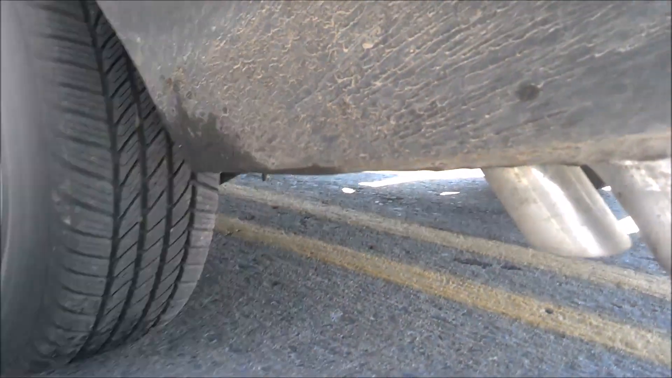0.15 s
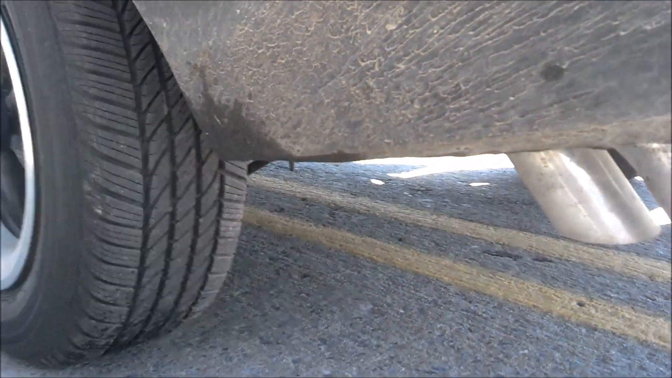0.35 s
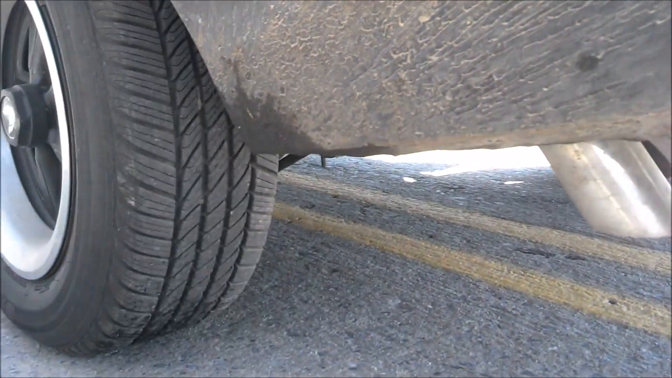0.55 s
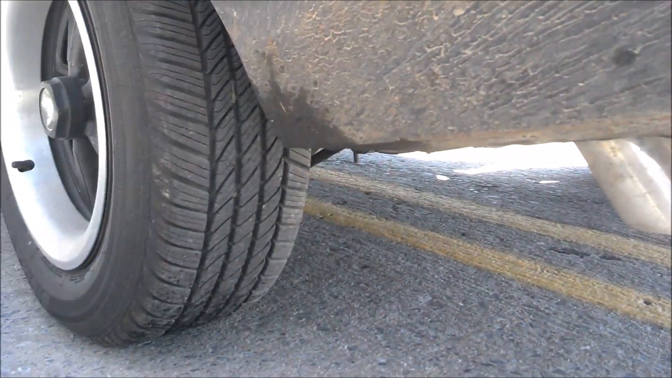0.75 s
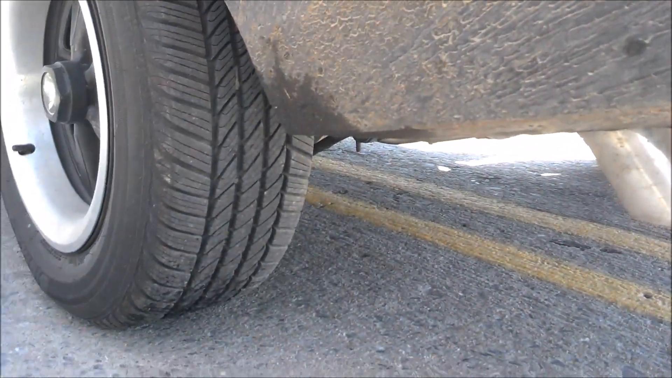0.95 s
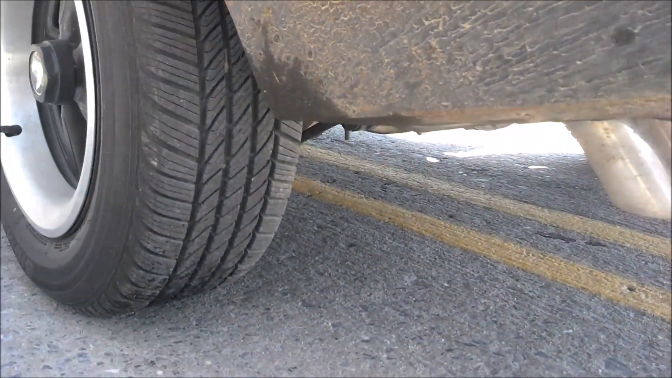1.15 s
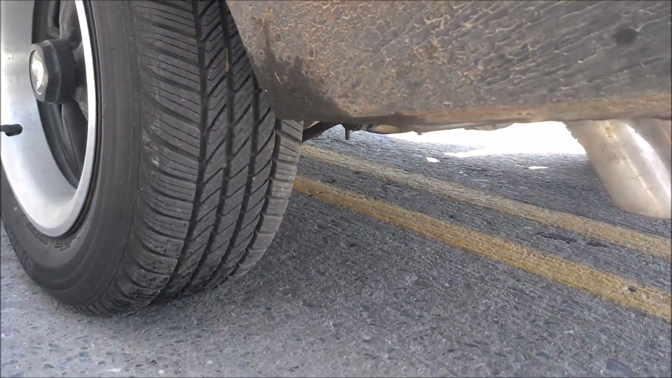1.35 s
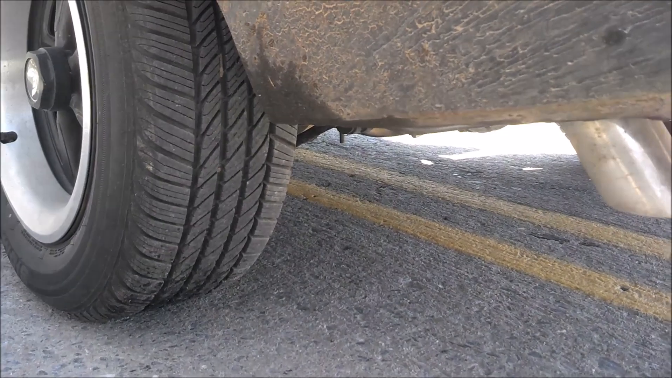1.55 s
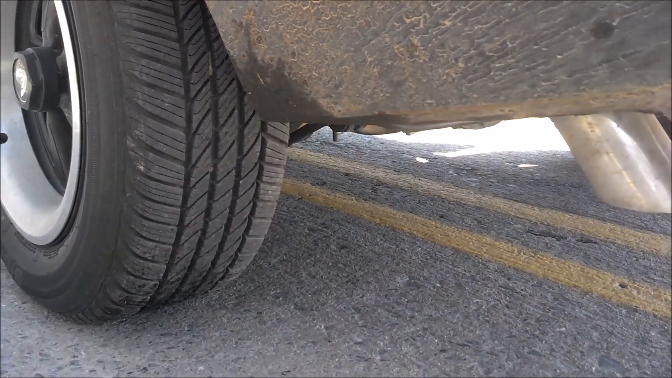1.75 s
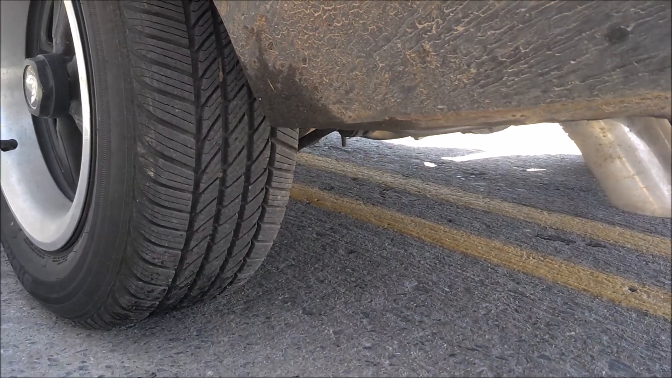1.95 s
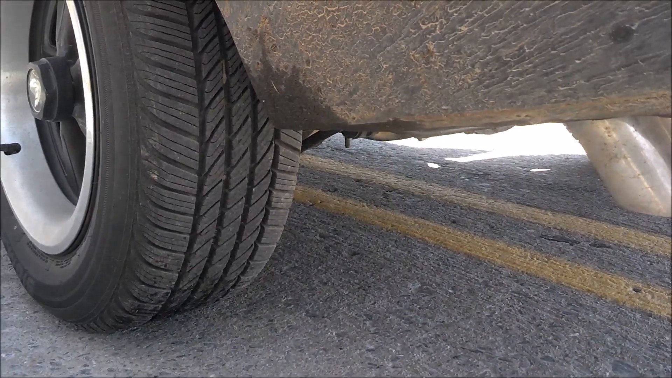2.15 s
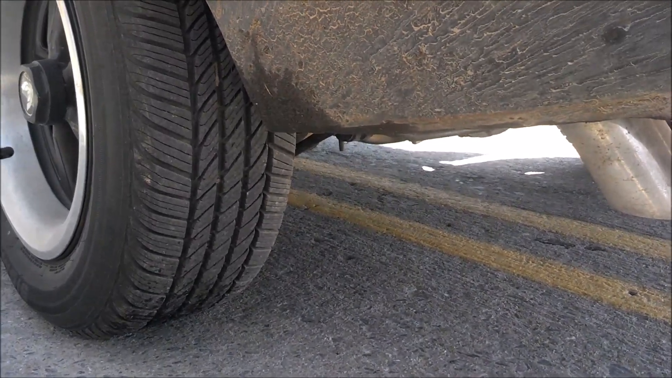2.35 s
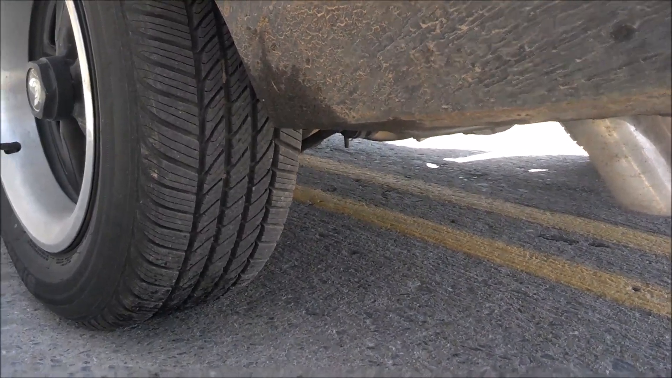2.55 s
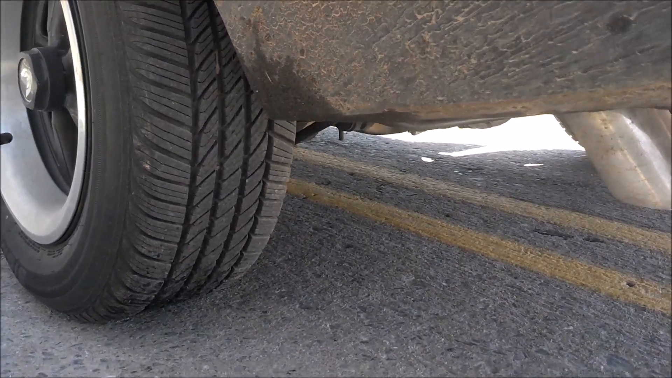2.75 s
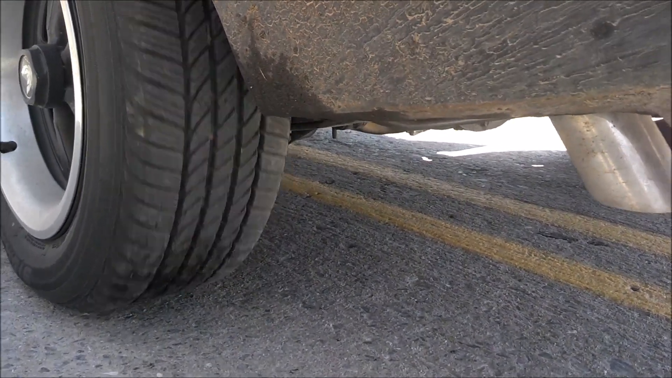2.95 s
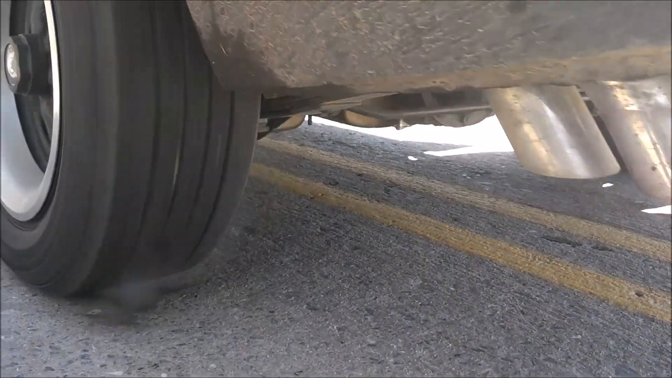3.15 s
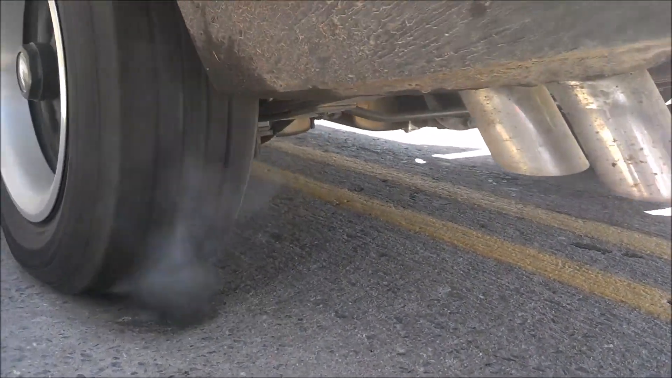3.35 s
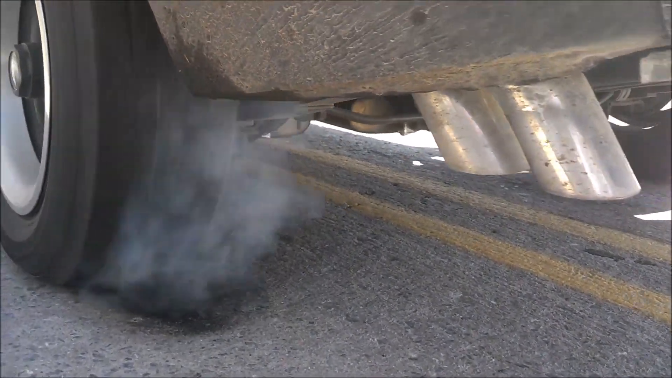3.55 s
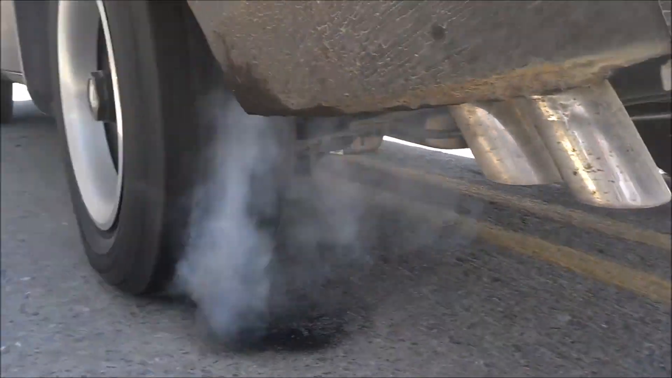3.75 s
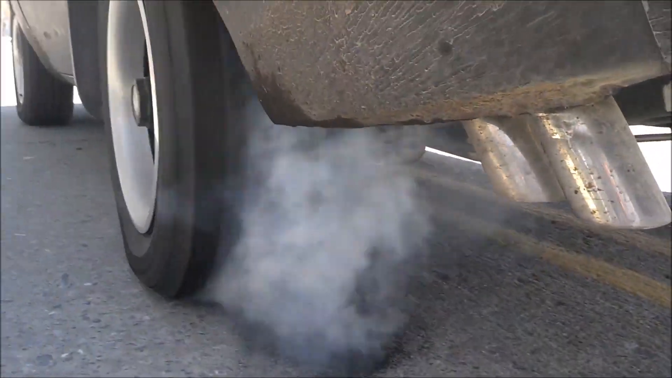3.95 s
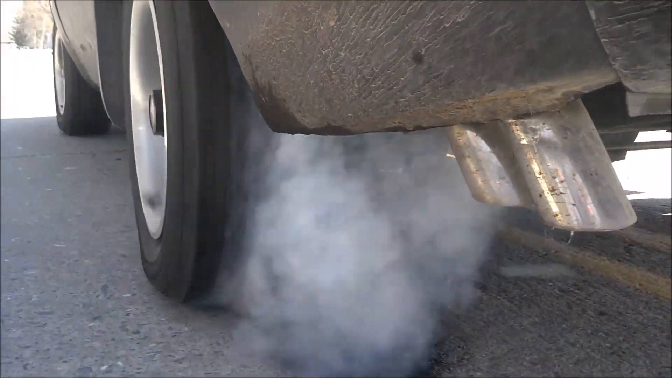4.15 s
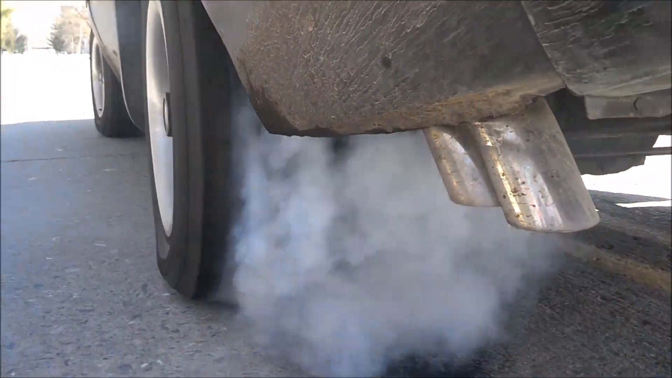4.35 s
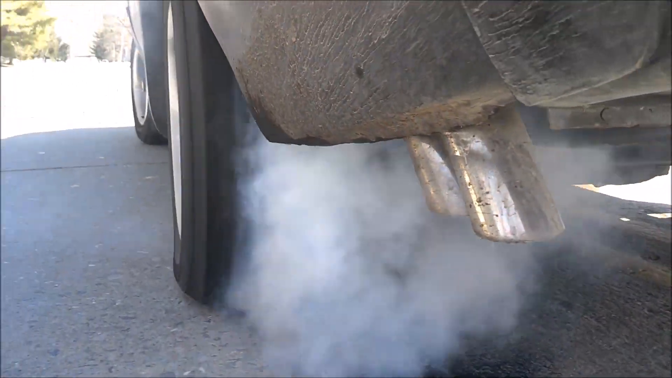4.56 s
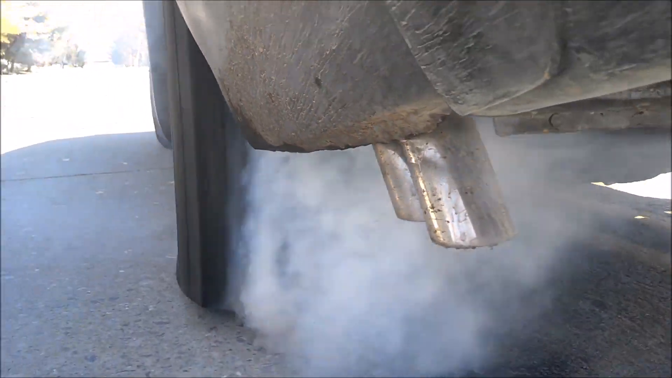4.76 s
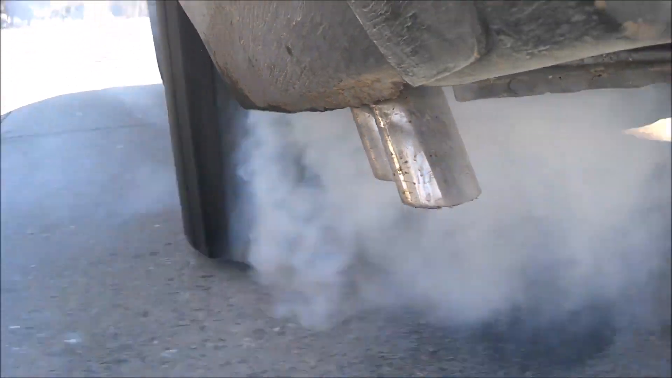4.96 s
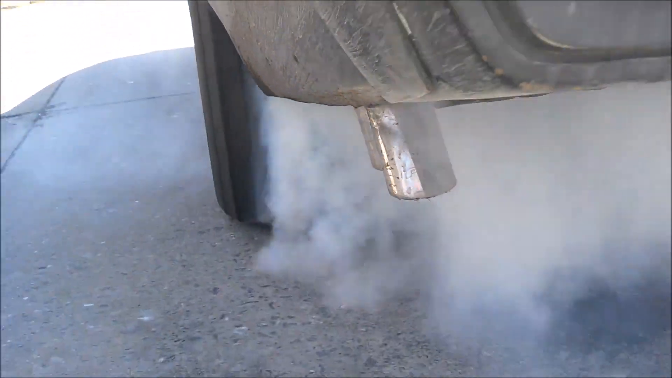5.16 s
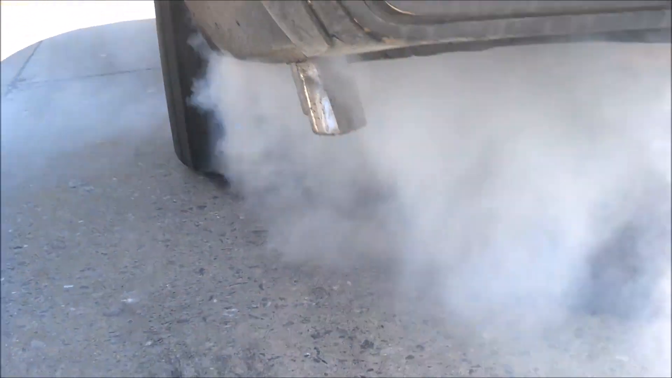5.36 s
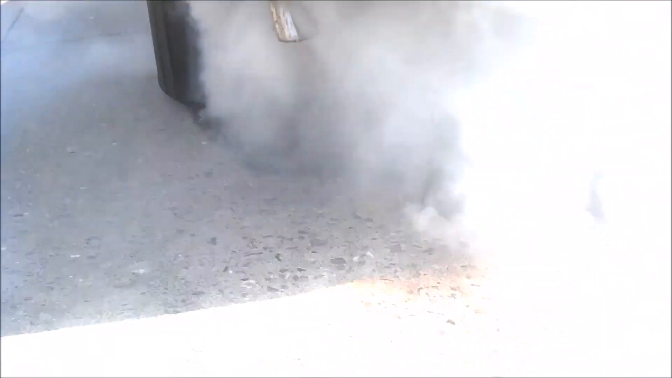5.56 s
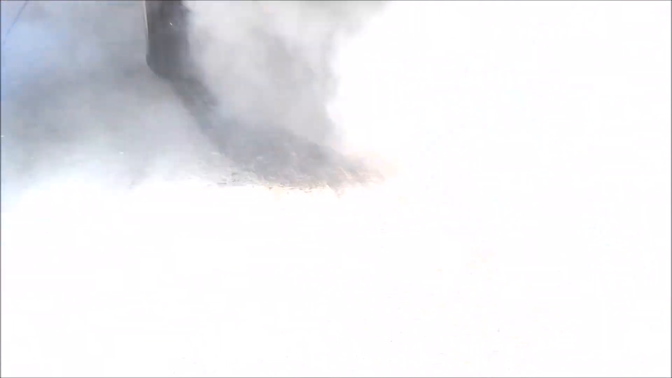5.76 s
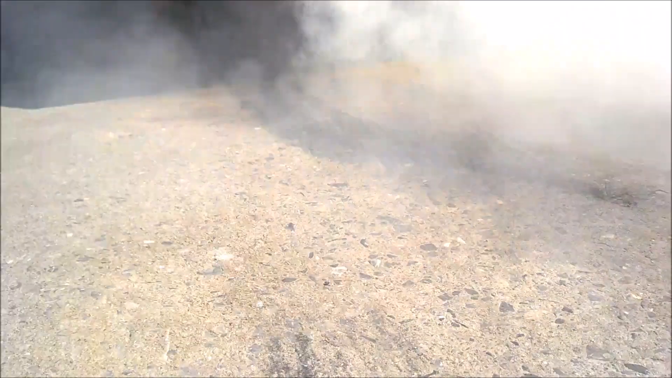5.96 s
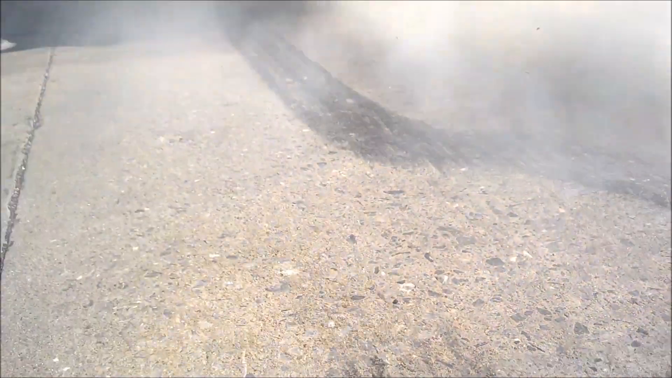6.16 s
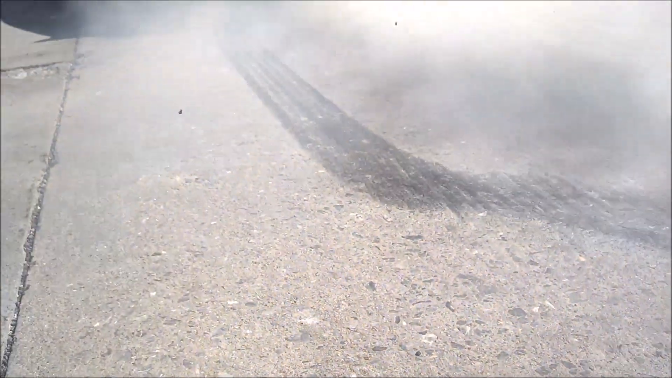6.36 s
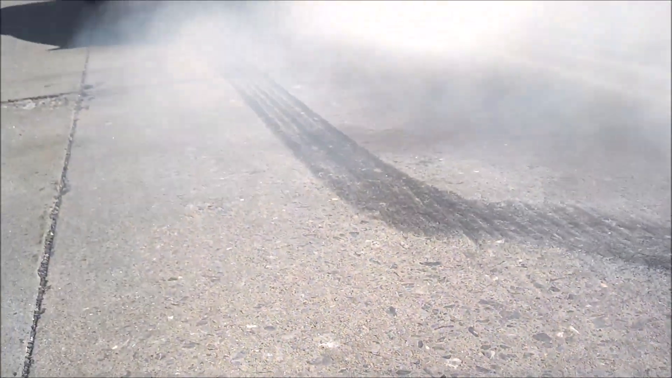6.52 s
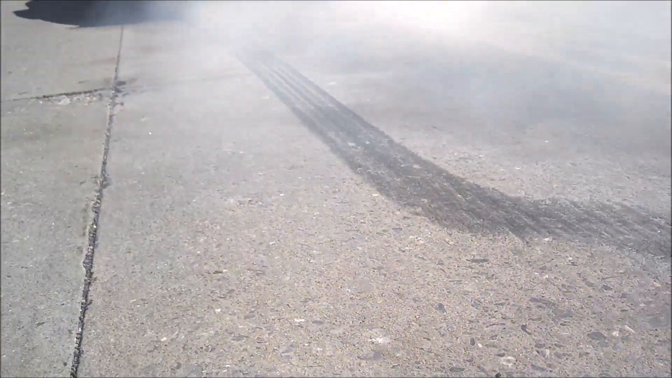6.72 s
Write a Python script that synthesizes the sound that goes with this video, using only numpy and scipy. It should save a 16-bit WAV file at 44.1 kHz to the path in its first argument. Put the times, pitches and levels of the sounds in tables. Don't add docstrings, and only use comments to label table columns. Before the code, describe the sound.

Close beside the tail pipes of a car on an open road, an eight-cylinder engine idles in a low, slightly uneven burble with soft gas hiss. Near three seconds the throttle gulps air, the revs leap and the rear tyres spin, squealing loud and high over tearing rubber. The engine climbs to a hard growl; at the end the squeal thins into chirps. The two close microphones overload, sounding wide and gritty.

```python
import sys
import numpy as np
from scipy import signal
from scipy.fft import rfft, irfft, next_fast_len
from scipy.io import wavfile
from scipy.ndimage import map_coordinates

SR = 44100
rng = np.random.default_rng(int(sys.argv[2]) if len(sys.argv) > 2 else 0)


def rack_gain(trim_db):
    fader = np.asarray(trim_db, float)
    return 10 ** (fader / 20)


def pcm_store(signal):
    levels = np.round(np.clip(np.atleast_2d(signal), -1, 1) * 32767)
    wavfile.write(sys.argv[1], SR, levels.astype(np.int16).T)


N = 299439
TIME = np.arange(N) / SR
FAST = next_fast_len(N)
CYLINDERS = 8


def evened(x):
    return x / np.sqrt(np.mean(x ** 2) + 1e-20)


def curves(rows):
    s, *columns = np.transpose(rows)
    return [np.interp(TIME, s, c) for c in columns]


def ramp(x, start, span):
    return np.clip((x - start) / span, 0, 1)


def plateau(start, length, edge):
    return np.interp(TIME - start, [-edge, edge, max(length - edge, edge), length + edge], [0, 1, 1, 0])


def read(points, hz):
    f, value = np.transpose(points)
    return np.interp(np.log(hz + 1), np.log(f + 1), value)


def coloured(x, points):
    log_gain = np.log(rack_gain(read(points, abs(np.fft.fftfreq(8192, 1 / SR)))))
    taps = np.fft.ifft(np.exp(np.conj(signal.hilbert(log_gain)))).real[:4096]
    return signal.oaconvolve(x, taps)[:N]


def drift(hz):
    size = next_fast_len(N // 16 + 2)
    roll_off = 1 + (np.fft.rfftfreq(size, 16 / SR) / hz) ** 2
    smooth = irfft(rfft(rng.standard_normal(size)) / roll_off, size)
    return evened(np.interp(np.arange(N) / 16, np.arange(size), smooth))


# frequency in Hz, likeness 0-1.
LIKENESS = [(50, 1), (250, 0.72), (600, 0.74), (1000, 0.78), (1800, 0.05), (4000, 0), (15000, 0)]


def pair(envelope, colour):
    hz = np.fft.rfftfreq(FAST, 1 / SR)
    common, *own = rfft(envelope * rng.standard_normal((3, N)), FAST)
    alike = np.clip(read(LIKENESS, hz), 0, 1)
    both = np.sqrt(alike) * common + np.sqrt(1 - alike) * np.array(own)
    return evened(irfft(both * rack_gain(read(colour, hz)), FAST)[:, :N])


# time in seconds, level in dB.
SCRUB_LEVEL = [(2.98, -90), (3.06, -39.5), (3.8, -32), (4.3, -30.5), (5.75, -32.5), (6.25, -35),
               (6.5, -40.5), (6.79, -48)]
# frequency in Hz, gain in dB.
SCRUB_SPECTRUM = [(30, -74), (100, -10), (250, 3), (600, 2), (850, 0.5), (1200, 6.5), (1800, -7),
                  (3200, -13.5), (5000, -13.5), (8000, -19.5), (11000, -28.5), (15500, -28.5)]


def scrub():
    level_db, = curves(SCRUB_LEVEL)
    grains = rack_gain(6.9 * rng.exponential(1, N)) * (rng.random(N) < 2500 / SR)
    roughness = rack_gain(1.13 * drift(44)) + 0.12 * evened(grains)
    return rack_gain(level_db + 14.5) * pair(roughness, SCRUB_SPECTRUM)


# start in seconds, length in seconds, level in dB.
LOW_THUMPS = [
    (3.085, 0.078, -17.5),
    (3.583, 0.036, -37),
    (3.722, 0.11, -13.5),
    (5.096, 0.046, -30),
    (6.725, 0.03, -46),
]
BLAST_ON_S, BLAST_IDLE_DB, BLAST_DB, BLAST_FADE_DB_PER_S = 3.05, -70, -29.5, 3


def buffeting():
    since = TIME - BLAST_ON_S
    blast_db = np.where(since > 0, BLAST_DB - BLAST_FADE_DB_PER_S * since, BLAST_IDLE_DB)
    blast = np.array([drift(280) * rack_gain(1.3 * drift(7.7)) for _ in range(2)])
    blast = signal.sosfilt(signal.butter(2, 90, "high", fs=SR, output="sos"), blast)
    thumps = sum(rack_gain(db) * plateau(s, length, 0.012) for s, length, db in LOW_THUMPS)
    return rack_gain(blast_db) * evened(blast) + thumps * np.array([drift(45) for _ in range(2)])


# time in seconds, firings per second.
FIRING_RATE = [(0.0, 59.5), (0.6, 59.3), (1.0, 58.2), (1.5, 59.0), (2.78, 57.7), (2.87, 78.0),
               (2.97, 107.0), (3.1, 129.0), (3.3, 148.3), (3.6, 168.1), (3.9, 180.9), (4.5, 190.0),
               (4.8, 199.0), (5.1, 216.4), (5.7, 235.6), (6.0, 241.1), (6.3, 241.6), (6.79, 229.8)]
FIRING_DB = [-1, -3, -3, -1, 0, 1, 2, 1]
# extra strength of that firing under load in dB, so that the cycle throbs.
LOAD_THROB_DB = [-6, -5, -2, -4, 2, 0, 4, -3]
PIPE_DELAY_MS = [.62, .9, .84, 0, .22, .16, .46, .44]


def firings():
    firing_hz, = curves(FIRING_RATE)
    turns = np.cumsum(firing_hz) / SR
    load = ramp(firing_hz, 62, 60)
    at = np.flatnonzero(np.diff(np.floor(turns))) + 1
    cylinder = turns[at].astype(int) % CYLINDERS
    chance = rng.standard_normal((len(at), 2))
    place = at - turns[at] % 1 * SR / firing_hz[at] + np.array(PIPE_DELAY_MS)[cylinder] * SR / 1000
    whole = np.minimum(place.astype(int), N - 2)
    firing_db = np.array(FIRING_DB)[cylinder]
    pulse_db = firing_db + np.array(LOAD_THROB_DB)[cylinder] * load[at] + 1.2 * chance[:, 0]
    size = rack_gain(pulse_db) * np.sqrt(60 / firing_hz[at])
    pulses, puffs = np.zeros((2, N))
    pulses[whole] = size * (1 - place % 1)
    pulses[whole + 1] = size * (place % 1)
    puffs[whole] = rack_gain(firing_db + 2.5 * chance[:, 1]) * 60 / firing_hz[at]
    return firing_hz, turns, load, pulses, puffs


# frequency in Hz, gain in dB.
HISS_SPECTRUM = [(60, 11), (170, 20.5), (330, 8.5), (470, 10.5), (700, -7.5), (1100, 8.5), (1450, 2.5),
                 (1900, -8), (3000, -8), (4200, -7), (6200, -7), (7500, -16), (10000, -18), (15000, -30.5)]
# frequency in Hz, gain in dB.
INTAKE_SPECTRUM = [(3000, -15), (4200, -9), (5200, 6), (6200, 0), (7500, -4), (11000, -24), (15000, -33)]
# frequency in Hz, gain in dB.
COUGH_SPECTRUM = [(120, -7), (230, 9), (330, 0), (470, 12), (700, -22), (1050, 9.5), (1450, -1.5),
                  (1900, -24)]
# start in seconds, length in seconds, gulp of air in dB, cough of gas in dB.
THROTTLE_GULPS = [
    (2.754, 0.14, -35.5, -34),
    (2.873, 0.06, -26, -19),
    (2.941, 0.1, -28, -20.5),
]
GAS_IDLE_DB, GAS_OPEN_DB, GAS_FADE_DB_PER_S, GAS_FADE_FROM_S = -43.5, 4, 12.5, 3.76
LOPE_DB, SWELL_DB = 1.2, 0.6


def gas_flow(puffs, load, lope):
    gate = 1.3 + signal.lfilter([1], [1, -np.exp(-1 / (0.008 * SR))], puffs)
    gulps = sum(rack_gain(db) * plateau(s, length, 0.0088) for s, length, db, _ in THROTTLE_GULPS)
    coughs = sum(rack_gain(db) * plateau(s, length, 0.0034) for s, length, _, db in THROTTLE_GULPS)
    fade_db = GAS_FADE_DB_PER_S * np.maximum(TIME - GAS_FADE_FROM_S, 0)
    lope_db = LOPE_DB * lope + SWELL_DB * drift(20)
    level = rack_gain(GAS_IDLE_DB + GAS_OPEN_DB * load - fade_db + lope_db + 18)
    hiss = level * pair(gate * rack_gain(0.93 * drift(25)), HISS_SPECTRUM)
    return hiss + gulps * pair(gate, INTAKE_SPECTRUM) + coughs * pair(gate ** 2, COUGH_SPECTRUM)


GROWL_DB, GROWL_FROM_HZ, GROWL_SPAN_HZ = -33, 172, 20


def growl(firing_hz, turns):
    tones = 0
    for k in range(4, 13):
        tone = np.sin(2 * np.pi * k / CYLINDERS * turns + k * k / 25)
        tones = tones + np.sqrt(6 / k) * rack_gain(3 * drift(6)) * tone
    return rack_gain(GROWL_DB) * ramp(firing_hz, GROWL_FROM_HZ, GROWL_SPAN_HZ) * tones


TAIL_ORDERS = [23, 24, 21, 20, 22]
TAIL_LEVEL_DB = [-24, -27, -32, -32.5, -39]
TAIL_FROM_HZ, TAIL_SPAN_HZ, TAIL_FADE_S, TAIL_FADE_DB_PER_S = 196, 35, 6.23, 10


def tail_tones(firing_hz, turns, sway_db):
    level_db = sway_db - TAIL_FADE_DB_PER_S * np.maximum(TIME - TAIL_FADE_S, 0)
    level = ramp(firing_hz, TAIL_FROM_HZ, TAIL_SPAN_HZ) * rack_gain(level_db)
    return level * sum(rack_gain(db) * np.sin(2 * np.pi * eighths / CYLINDERS * turns)
                       for eighths, db in zip(TAIL_ORDERS, TAIL_LEVEL_DB))


SILENCER_ORDERS = [16, 15, 14, 17]
SILENCER_LEVEL_DB = [-0.5, -4.5, -3.5, -8]
THROB_FROM_HZ, THROB_SPAN_HZ = 185.5, 22


def silencer_tones(firing_hz, turns, load, level_db):
    throb = ramp(firing_hz, THROB_FROM_HZ, THROB_SPAN_HZ)
    tones = 0
    for k, (eighths, db) in enumerate(zip(SILENCER_ORDERS, SILENCER_LEVEL_DB)):
        tone = np.sin(2 * np.pi * eighths / CYLINDERS * turns)
        tones = tones + rack_gain(level_db + db + 3) * load * (throb if k else 1) * tone
    return tones


# time in seconds, low beat in dB, bark of the silencer in dB.
EXHAUST_LEVEL = [(0.0, -29.5, -82), (2.8, -30, -72), (2.87, -26, -25), (3.04, -21.5, -14.5),
                 (3.13, -31.5, -54), (3.22, -25.5, -28), (3.8, -41, -21), (4.0, -31, -16.5),
                 (4.7, -28, -16), (5.9, -53.5, -23.5), (6.18, -29, -25), (6.7, -33, -39), (6.79, -48, -39)]
# frequency in Hz, gain in dB.
SHUT_PIPES = [(20, -14.5), (60, -16.5), (118, 10), (165, -14.5), (230, 2), (290, -31.5), (450, -22),
              (700, -38), (1100, -29), (1500, -63), (4000, -50)]
# frequency in Hz, gain in dB.
OPEN_PIPES = [(20, -70), (70, -85), (140, 30.5), (230, 17), (290, 6.5), (450, -20), (580, -17), (690, -5),
              (850, -34), (1200, -7), (1500, -18), (2000, -34), (4000, -58)]
# frequency in Hz, gain in dB.
SILENCER_RESONANCE = [(250, -42.5), (340, 7), (400, 0.5), (490, 4.5), (560, -6), (680, -10), (850, -21),
                      (1250, 6.5), (1450, -23.5), (2000, -45)]
BARK_SHUT_DB, BARK_FROM_HZ, BARK_SPAN_HZ = -9, 123.6, 49.6
BEAT_LOPE_DB = 1.9


def exhaust(firing_hz, turns, load, pulses, lope):
    beat_db, bark_db = curves(EXHAUST_LEVEL)
    idle = rack_gain(10 + BEAT_LOPE_DB * lope) * (1 - load) * evened(coloured(pulses, SHUT_PIPES))
    loaded = rack_gain(3) * load * evened(coloured(pulses, OPEN_PIPES))
    drone = rack_gain(beat_db + 5.5) * load * np.sin(2 * np.pi * turns)
    shut_db = BARK_SHUT_DB * (1 - ramp(firing_hz, BARK_FROM_HZ, BARK_SPAN_HZ))
    bark = rack_gain(bark_db + shut_db - 7.5) * evened(coloured(pulses, SILENCER_RESONANCE))
    sway_db = 1.5 * drift(8)
    tones = tail_tones(firing_hz, turns, sway_db)
    tones = tones + silencer_tones(firing_hz, turns, load, bark_db + sway_db)
    return rack_gain(beat_db) * (idle + loaded) + drone + bark + growl(firing_hz, turns) + tones


LOPE_TURNS = 0.76


def engine():
    firing_hz, turns, load, pulses, puffs = firings()
    lope = np.cos(2 * np.pi * (turns / CYLINDERS - LOPE_TURNS))
    return exhaust(firing_hz, turns, load, pulses, lope), gas_flow(puffs, load, lope)


UPPER_PARTIALS_DB = [-16, -18]


def stick_slip(hz, octave_db):
    angle = 2 * np.pi * np.cumsum(hz) / SR
    partials_db = [0, octave_db, *UPPER_PARTIALS_DB]
    return sum(rack_gain(db) * np.cos(k * angle + k) for k, db in enumerate(partials_db, 1))


BLOCK_OFFSET_HZ = [-45.5, 0.5, 40.5, 94.5, 172.5]
JUDDER_DB, JUDDER_TURNS, JUDDER_FROM_S, JUDDER_SPAN_S = 5, 0.18, 5.9, 2.3


def loose_blocks(hz, octave_db):
    blocks = 0
    for off_hz in BLOCK_OFFSET_HZ:
        tone = stick_slip(hz + off_hz + 30 * drift(15), octave_db + 8)
        blocks = blocks + tone * rack_gain(6.5 * drift(48))
    cycles = np.cumsum(curves(FIRING_RATE)[0]) / SR / CYLINDERS
    shaking = ramp(TIME, JUDDER_FROM_S, JUDDER_SPAN_S)
    return blocks * rack_gain(JUDDER_DB * shaking * np.cos(2 * np.pi * (cycles - JUDDER_TURNS)))


# time in seconds, squeal in dB, octave relative to the squeal in dB.
SQUEAL_LEVEL = [(3.02, -68, -24), (3.04, -14, -24), (3.14, -25, -19.5), (3.17, -9, -13), (3.9, -13, -19.5),
                (4.0, -8, -30), (5.5, -12.5, -18), (6.45, -11, -21.5), (6.56, -17, -24), (6.79, -18.5, -25)]
# time in seconds, share of the contact patch 0-1.
IN_STEP = [(3.0, .94), (3.9, .9), (4.0, .3), (6.79, .15)]
# start in seconds, length in
# seconds, level in dB, pitch in Hz.
PATCH_LOCKS = [(3.045, 0.037, -11.5, 975), (3.075, 0.022, -11, 1017), (3.106, 0.049, -9, 1015),
               (3.323, 0.023, -8, 1047), (3.365, 0.029, -9, 1042), (3.404, 0.048, -11, 1037),
               (3.436, 0.12, -10.5, 1071), (3.568, 0.076, -9, 1067), (3.675, 0.19, -8.5, 1061),
               (3.903, 0.027, -12.5, 1069), (3.954, 0.042, -12, 1101), (4.059, 0.035, -12, 1082),
               (4.161, 0.035, -9, 1055), (4.219, 0.045, -7.5, 1060), (4.271, 0.038, -13, 1075),
               (4.371, 0.062, -8, 1048), (4.59, 0.049, -10.5, 1098), (4.833, 0.03, -10.5, 1080),
               (4.856, 0.03, -12, 1125), (4.932, 0.032, -10.5, 1063), (5.071, 0.032, -13, 1044),
               (5.218, 0.027, -9.5, 1078), (5.338, 0.027, -10.5, 1110), (5.511, 0.034, -11.5, 1096),
               (5.65, 0.047, -12, 1053), (6.21, 0.031, -7.5, 1056), (6.422, 0.048, -10.5, 1075),
               (6.5, 0.032, -12.5, 1041),
    (6.563, 0.0096, -10, 1074),
    (6.593, 0.0191, -17, 1140),
    (6.631, 0.023, -14, 1048),
    (6.699, 0.0187, -15.5, 1109),
    (6.725, 0.014, -14, 1029),
    (6.744, 0.015, -11, 1074),
]
TREAD_HZ, SAG_HZ, SAG_S, SPIN_S = 1060, 108.96, 0.16, 3.04
LOCK_EDGE_S, LOCK_DRIVE, LOCK_DB, LOCK_OCTAVE_DB = 0.0013, 1.87, -4.5, 4


def squeal():
    hz = TREAD_HZ - SAG_HZ * np.exp(-np.maximum(TIME - SPIN_S, 0) / SAG_S)
    level_db, octave_db = curves(SQUEAL_LEVEL)
    steady, = curves(IN_STEP)
    loose = loose_blocks(hz, octave_db)
    for s, length, db, lock_hz in PATCH_LOCKS:
        shape = plateau(s, length, LOCK_EDGE_S)
        hz = hz + shape * (lock_hz - hz)
        octave_db = octave_db + shape * LOCK_OCTAVE_DB * (1 - steady)
        steady = steady + shape * (0.97 - steady)
        level_db = level_db + shape * (LOCK_DB + LOCK_DRIVE * (db + 9.5) - level_db)
    locked = stick_slip(hz + 18 * drift(44.8), octave_db + 5.5) * rack_gain(2.0 * drift(52))
    steady = np.clip(steady, 0, 1)
    mixed = np.sqrt(steady) * evened(locked) + np.sqrt(1 - steady) * evened(loose)
    return rack_gain(level_db - 5.5) * mixed


# time in seconds, lead at the first microphone in ms.
ARRIVAL_LEAD = [(0, -0.011), (2.8, -0.073), (3.2, 0.08), (5.5, 0.1), (6.79, 0.14)]


def underbody(x):
    lead_ms = curves(ARRIVAL_LEAD)[0] + 0.034 * drift(17)
    lead = lead_ms * SR / 2000
    return np.array([map_coordinates(x, [np.arange(N) + side * lead], order=1) for side in (1, -1)])


# frequency in Hz, first minus second microphone in dB.
BODY_SHADE = [(120, 0), (230, 1), (400, -2), (1000, -1), (2100, 5), (3500, 2), (6000, 4), (10000, 0)]


def scene():
    beat, gas = engine()
    both = underbody(beat + squeal()) + gas + scrub() + buffeting()
    shade_db = read(BODY_SHADE, np.fft.rfftfreq(FAST, 1 / SR)) * np.array([[.5], [-.5]])
    return irfft(rfft(both, FAST) * rack_gain(shade_db), FAST)[:, :N]


def low_pass(x):
    return signal.sosfilt(signal.butter(12, 15660, fs=SR, output="sos"), x)


WIDEN_DELAY = 16


def record(dry):
    ceiling = 0.4 * (1 + 0.074 * np.sign(dry) * [[1], [-1]])
    clipped = dry / (1 + (abs(dry) / ceiling) ** 4) ** .25
    wide = clipped - np.roll(clipped[::-1], WIDEN_DELAY, axis=1)
    return low_pass(np.clip(wide, -1, 1))


dry = scene()
out = record(dry)
pcm_store(out)
```